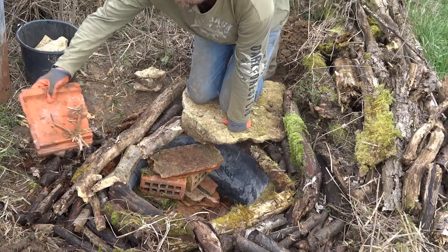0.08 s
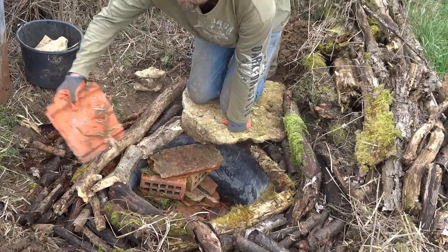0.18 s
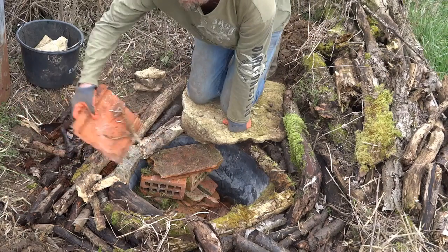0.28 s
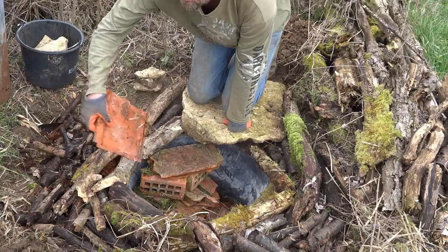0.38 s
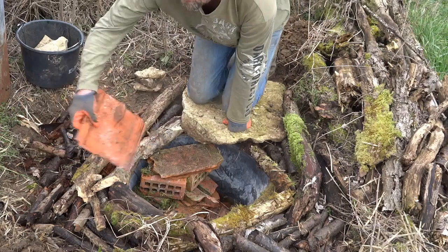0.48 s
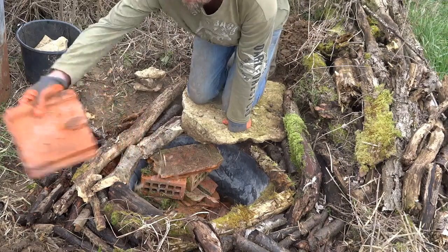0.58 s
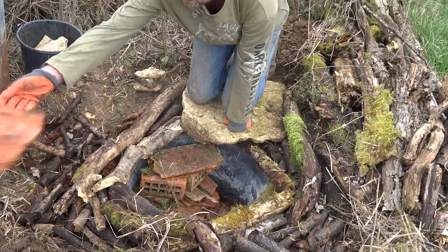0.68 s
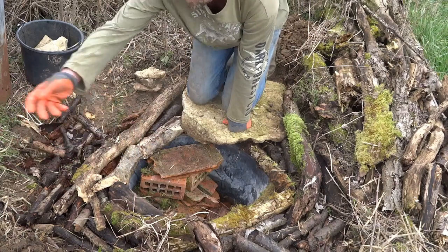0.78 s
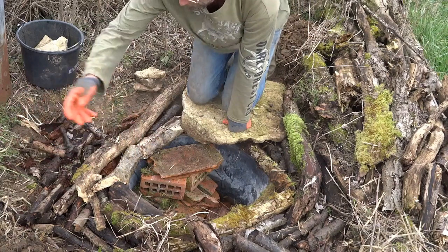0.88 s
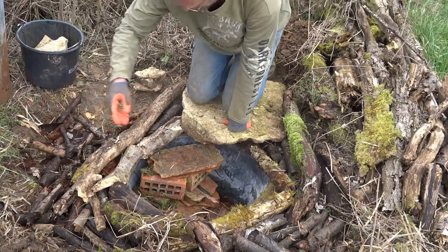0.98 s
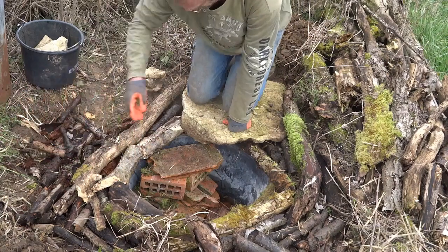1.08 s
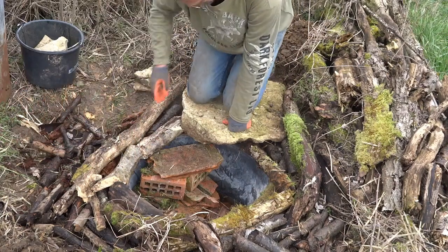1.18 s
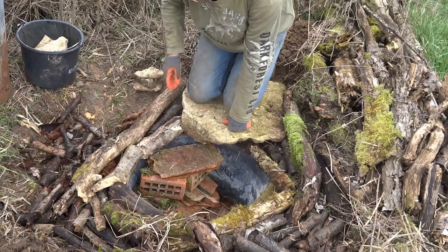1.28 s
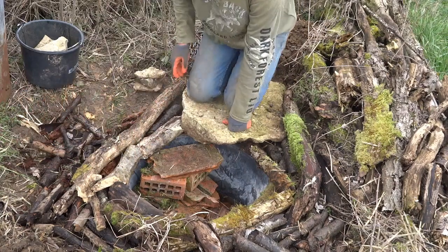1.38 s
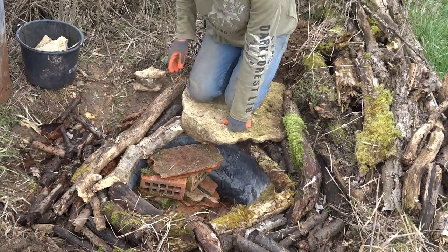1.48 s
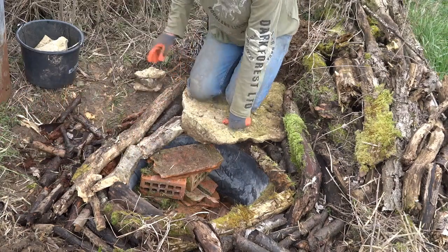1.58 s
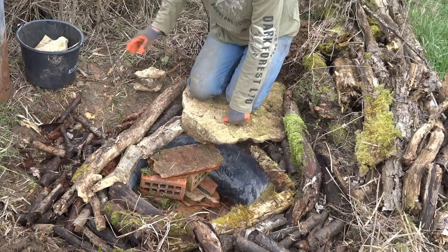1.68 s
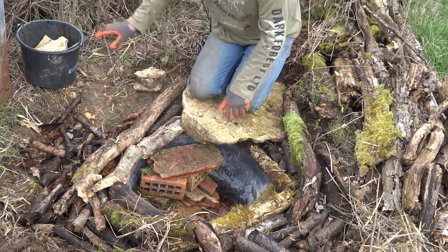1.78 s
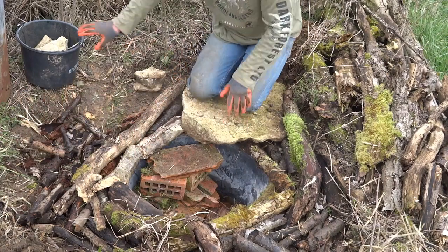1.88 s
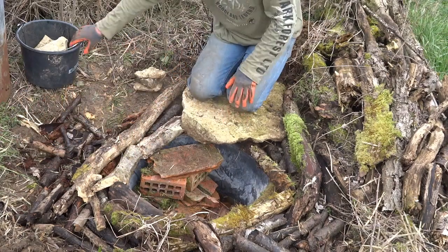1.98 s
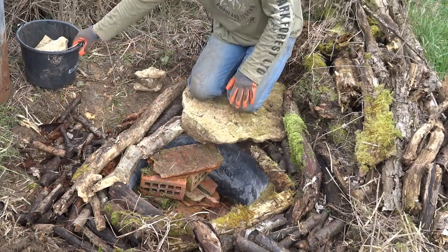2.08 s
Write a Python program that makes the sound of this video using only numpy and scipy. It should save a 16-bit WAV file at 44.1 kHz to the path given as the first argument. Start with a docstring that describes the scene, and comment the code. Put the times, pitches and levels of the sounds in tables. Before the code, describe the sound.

A clay roof tile clatters on bricks, then a thrown tile lands with a clink outdoors.

```python
"""A small bird chirps at the start, as gliding sine whistles over faint outdoor air made of coloured noise. A
clay roof tile clatters on a stack of bricks and broken tiles: noise clacks plus ringing modes; it stops dead. A
tile slips from a gloved hand with rubs of random slips and grit bursts; a low narrow-band hum comes and goes.
The tile lands to the left with a clink, its own clacks and modes, with a weak garden tail. A soft bump, a twig
snap, a last faint bird whistle and a faint low burst at the very end follow; all are noise bursts but the
whistle."""
import sys
import numpy as np
from scipy import signal
from scipy.fft import rfft, irfft
from scipy.io import wavfile

SR = 44100
rng = np.random.default_rng(int(sys.argv[2]) if len(sys.argv) > 2 else 0)


def generate_wav(sig):
    """Save sig (samples, or channels by samples) to the path in sys.argv[1] as 16-bit PCM at SR."""
    pcm = np.round(np.clip(np.atleast_2d(sig).T, -1, 1) * 32767).astype(np.int16)
    wavfile.write(sys.argv[1], SR, pcm)


N = 92610
TIME_S = np.arange(N) / SR
AGE_S = np.arange(SR // 3) / SR  # time since the start of one impact

# Contacts of tile and stack. Each row: start [s], level [dB], brightness [dB per octave], extra ring [dB].
KNOCKS = [(0.2353, -19.5, 5.5, 4), (0.2412, -17, -7.5, -6), (0.2438, -14.5, 1, 0.5),
          (0.2485, -20.5, 11.5, -8), (0.2540, -19, -6.5, -3.5), (0.2622, -20.5, -1.5, 3),
          (0.2712, -17.5, -3.5, -7.5), (0.277, -19.5, 0, 4), (0.2855, -19.5, -4.5, -20.5),
          (0.2905, -21.5, -0.5, -6), (0.2955, -31, 0, 0), (0.3172, -26, 3, -2), (0.3192, -22, -1, -1),
          (0.3222, -19.5, 0, -0.5), (0.326, -27, 0.5, 3), (0.335, -40.5, 3, 16.5), (0.3395, -19, -2, -16),
          (0.3505, -35, -13, -0.5), (0.3665, -24, 0, -6), (0.3855, -40, 5, -8), (0.3918, -28, 0, -2),
          (0.3938, -25, -4, 3), (0.4065, -44, -7, -27), (0.4125, -28, -5.5, 5)]
# Spectrum of the dense part of a knock. Each row: frequency [Hz], level [dB per Hz].
KNOCK_CLACK_COLOUR = [(40, -51), (110, -34), (200, -13.5), (330, -3.5), (900, 5.5), (1350, -6), (1700, -2),
                      (3000, -6), (4000, -25), (5200, -34.5), (6500, -28), (8000, -40.5), (11000, -32)]
# Damping of that part. Each row: frequency [Hz], 60 dB decay time [s].
KNOCK_CLACK_T60 = [(200, 0.019), (1000, 0.044), (3000, 0.024), (10000, 0.044)]
# Modes of the tile. One list each: frequency [Hz], level [dB], 60 dB decay time [s].
TILE_HZ = [337, 582, 798, 931, 1104, 1266, 1442, 1782, 2301, 2550, 2790, 3056, 5740, 6640]
TILE_DB = [-13, -11, -18, -5.5, -4, -5.5, -8.5, -13, -15.5, -24, -31, -22, -41, -32]
TILE_T60_S = [0.13, 0.16, 0.088, 0.16, 0.067, 0.076, 0.12, 0.12, 0.12, 0.068, 0.043, 0.049, 0.19, .05]
# Modes of the stack. One list each: frequency [Hz], level [dB], 60 dB decay time [s].
STACK_HZ = [400, 465, 562, 620, 684, 836, 953, 1029, 1202, 1323, 1375, 1675, 1842, 1960]
STACK_DB = [-11.5, -19.5, -13, -7, -13.5, -21.5, -6, -7, -7.5, -8.5, -21, -18.5, -16, -21.5]
STACK_T60_S = [0.042, 0.023, 0.21, 0.022, 0.052, 0.12, 0.16, 0.028, 0.11, .08, 0.036, .08, .06, .07]

# Contacts of the thrown tile. Each row: start [s], level [dB], brightness [dB per octave], extra ring [dB].
LANDINGS = [(1.0635, -37, 5, -6), (1.0697, -26, 1, -1), (1.0737, -29, -1, 5), (1.079, -33, 2, 1),
            (1.0842, -36, -5, 6), (1.166, -58, 1, 2), (1.189, -58, 1, 0)]
# Spectrum of its dense part. Each row: frequency [Hz], level [dB per Hz].
THROWN_CLACK_COLOUR = [(60, -36), (180, -17), (400, -17.5), (900, 6), (2000, 4), (3100, -16), (4200, -17),
                       (8000, -29.5), (11000, -18.5)]
# Damping of that part. Each row: frequency [Hz], 60 dB decay time [s].
THROWN_CLACK_T60 = [(200, 0.13), (1000, 0.027), (3000, 0.061), (10000, 0.11)]
# Modes of the thrown tile. One list each: frequency [Hz], level [dB], 60 dB decay time [s].
THROWN_HZ = [760, 764, 925, 1252, 1325, 1500, 1798, 2052, 2616, 2795, 3040, 3640]
THROWN_DB = [-29.5, -4, -7, 3, 2, -8.5, -22, -6.5, -16, -13, -8, -14]
THROWN_MODE_T60_S = [0.39, 0.071, 0.042, 0.051, 0.03, 0.026, 0.054, 0.036, 0.088, .055, 0.047, 0.05]

# Grit crushed and scraped on the tile; dry twigs snapping; soft low bumps and a faint low burst at the very
# end. Each row: start [s], level [dB], centre [Hz], width [octaves], 60 dB decay time [s], left minus right
# [dB].
GRIT = [(0.2425, -37, 7700, 0.98, 0.026, -20), (0.248, -38.5, 6360, 0.11, 0.053, -7),
        (0.2714, -40, 5840, 0.25, 0.01, -3), (0.2905, -37, 6000, 0.11, 0.0073, -10),
        (0.710, -38, 1250, 0.47, 0.099, 0.5), (0.730, -39.5, 1450, 0.66, 0.09, 3),
        (0.749, -39.5, 1500, 0.48, 0.1, 0.5), (1.0793, -29.5, 10070, 0.098, 0.0093, -7),
        (1.083, -34.5, 11000, 0.24, 0.0079, 7)]
TWIGS = [(0.806, -53, 3000, 0.29, 0.067, 0), (0.830, -49, 5940, 1, 0.017, 0),
         (1.608, -54.5, 8460, 1, 0.035, 0), (1.7215, -38, 3350, .18, .013, -1),
         (1.7217, -43.5, 2200, 0.41, 0.029, -1), (1.722, -38.5, 9200, 0.44, 0.02, -0.5)]
BUMPS_AND_LAST_BURST = [(1.4612, -47.5, 671, 0.94, 0.045, -1), (1.4722, -38.5, 263, 0.7, 0.04, -0.5),
                        (2.089, -52.5, 665, 1, 0.26, -2)]

# Rubs of tile, glove and sleeve. Each row: start [s], rise [s], hold [s], release [s], level [dB],
# brightness [dB per octave], left minus right [dB].
RUBS = [(0.0, 0.0017, 0.1, 0.014, -54, -2.5, -2), (0.077, 0.018, 0.13, .01, -58, -1, -1.5),
        (0.199, 0.017, 0.1983, 0.015, -44.5, -2, -4.5), (0.647, 0.047, 0.065, 0.021, -52.5, 0, 1),
        (0.697, 0.0098, 0.035, 0.037, -49.5, 0, 1), (0.768, 0.017, 0.033, 0.29, -58, -2, 1),
        (1.055, 0.0047, 0.014, 0.012, -48, -2, 3), (1.103, .04, 0.061, 0.079, -61, -2, 3.5),
        (1.447, 0.0084, 0.028, 0.064, -58, -3.5, -0.5), (1.761, 0.017, 0.013, 0.027, -61, 0.5, 3),
        (2.006, 0.022, 0.075, 0.21, -56.5, -0.5, 0)]
# Spectrum of a rub. Each row: frequency [Hz], level [dB per Hz].
RUB_COLOUR = [(60, -44), (250, -20), (500, -6), (1200, -4.5), (2200, -4.5), (3200, -6.5), (4500, -14),
              (10500, -14.5)]

# Bird notes, one list of points per note. Each row: time [s], pitch [Hz], level [dB].
BIRD_NOTES = [
    [(0.007, 2800, -50.5), (0.011, 3950, -48), (0.016, 4320, -41), (0.021, 4280, -54.5), (0.026, 4500, -63)],
    [(0.025, 2900, -53), (0.030, 3280, -44.5), (0.042, 3400, -53), (0.052, 3950, -58.5), (0.062, 4380, -54),
     (0.069, 4480, -47.5), (0.075, 4950, -52.5), (0.0775, 3500, -46.5), (0.08, 2900, -54.5)],
    [(0.080, 4890, -66), (0.083, 4470, -50), (0.086, 3850, -46.5), (0.093, 3200, -50.5), (0.099, 2850, -66)],
    [(1.835, 4200, -79), (1.885, 4135, -67), (1.935, 4030, -87)],
]
# Hum level over time. Each row: time [s], level [dB].
HUM_LEVEL = [(0.68, -81), (0.78, -64), (0.85, -57), (0.95, -62.5), (1.02, -58.5), (1.2, -63), (1.35, -71),
             (1.48, -84)]
# Spectrum of the outdoor air. Each row: frequency [Hz], level [dB per Hz].
AIR_COLOUR = [(30, -33), (120, -25), (230, -19), (350, -12), (520, -7), (700, -8), (1150, -5), (1380, -1.5),
              (1550, -6.5), (2800, -6), (4500, -17), (6500, -13.5), (8000, -17), (11000, -18),
              (12500, -66.5)]
# Left-right likeness of the air, then of near sources. Each row: frequency [Hz], likeness [1 = identical].
AIR_SAME = [(60, 0.75), (220, 1), (830, 0.37), (3100, 0.69), (11600, 0.72)]
NEAR_SAME = [(100, 1), (2000, 0.97), (5000, 0.59), (11000, 0.95)]

STOP_S, STOP_FADE_S = 0.4155, 0.00065
KNOCK_CLACK_DB, KNOCK_RING_DB = -1, -5
THROWN_CLACK_DB, THROWN_RING_DB = -0.33, -2
STACK_PAN_DB, STACK_LAG_S = -2, -0.000018
THROWN_PAN_DB, THROWN_LAG_S = 4, -0.000016
BLOW_ATTACK_S, SNAP_ATTACK_S = 0.0003, 0.00023
BASS_EDGE_HZ, RECORDER_EDGE_HZ = 205, 11180
RUB_GRAINS_PER_S, RUB_GRAIN_DB = 5300, 3.5
RUB_SMOOTH, RUB_SAME = 0.27, 0.87  # steady noise per unit of slips; share common to both ears
GARDEN_T60_S, LANDING_GARDEN_DB, BIRD_GARDEN_DB = 0.41, -28, -7
HUM_HZ, HUM_OCTAVES = 348.3, 0.18
AIR_DB, AIR_PAN_DB, AIR_DRIFT_DB = -62.5, -0.3, 0.4


def amp(db):
    """Decibels to gain."""
    return 10 ** (np.asarray(db) / 20)


def unit(x):
    """Scales to rms 1."""
    return x / np.sqrt(np.mean(x ** 2) + 1e-20)


def read(points, hz):
    """Reads a table on a log-frequency axis."""
    table_hz, value = np.transpose(points)
    return np.interp(np.log(hz + 1), np.log(table_hz + 1), value)


def octaves(hz, centre_hz=1000):
    """Distance from a centre in octaves."""
    return np.log2((hz + 1) / centre_hz)


def tilt_db(hz, db_per_octave):
    """Brightness about 1 kHz, held constant below -1 and above +2 octaves."""
    return db_per_octave * np.clip(octaves(hz), -1, 2)


def pan(db):
    """Left and right gains for a left-minus-right level difference."""
    return amp(np.array([[db / 2], [-db / 2]]))


def add(mix, start_s, sound):
    """Mixes a sound in at a time."""
    part = mix[:, max(round(start_s * SR), 0):][:, :sound.shape[-1]]
    part += sound[..., :part.shape[1]]


def noise(size, colour_db, same):
    """Stereo noise of rms 1 from random phases, with a colour and a left-right likeness table."""
    hz = np.fft.rfftfreq(size, 1 / SR)
    mid, side = np.exp(2j * np.pi * rng.random((2, len(hz))))
    likeness = np.clip(read(same, hz), -1, 1)
    mid = mid * np.sqrt(1 + likeness)
    side = np.array([[1], [-1]]) * side * np.sqrt(1 - likeness)
    return unit(irfft((mid + side) * amp(colour_db(hz)), size))


def lagged(x, lag_s):
    """Delays the left ear against the right; a negative lag makes the left lead."""
    turn = np.exp(-2j * np.pi * np.fft.rfftfreq(N, 1 / SR) * lag_s)
    return np.array([irfft(rfft(x[0]) * turn, N), x[1]])


def radiated(x):
    """Small objects give off little bass: a high-pass."""
    high_pass = signal.butter(3, BASS_EDGE_HZ, "high", fs=SR, output="sos")
    return signal.sosfilt(high_pass, x)


def garden(x):
    """Diffuse scatter from logs, plants and trees: a decaying noise tail."""
    tail = rng.standard_normal((2, len(AGE_S))) * amp(-60 * AGE_S / GARDEN_T60_S)
    return signal.fftconvolve(x, tail / np.linalg.norm(tail[0]), axes=1)[:, :N]


def clack(colour, t60s, tilt):
    """Dense noise burst; each frequency band decays at its own rate."""
    burst = noise(len(AGE_S), lambda hz: read(colour, hz) + tilt_db(hz, tilt), NEAR_SAME)
    hz, frame_s, bands = signal.stft(burst, SR, nperseg=128)
    damped = bands * amp(-60 * frame_s / read(t60s, hz)[:, None])
    return signal.istft(damped, SR, nperseg=128)[1][:, :len(AGE_S)]


def ring(modes, tilt):
    """Modes of fired clay: decaying sines of alternating sign."""
    out = np.zeros(len(AGE_S))
    for k, (hz, db, t60_s) in enumerate(zip(*modes)):
        decay = amp(db + tilt_db(hz, tilt) - 60 * AGE_S / t60_s)
        out += (-1) ** k * decay * np.sin(2 * np.pi * hz * AGE_S)
    return out


def blows(rows, modes, ring_db, clack_db, colour, t60s):
    """Each contact gives a dense, short clack and rings the modes."""
    out = np.zeros((2, N))
    attack = 1 - np.exp(-AGE_S / BLOW_ATTACK_S)
    for start_s, db, tilt, own_ring_db in rows:
        dense = amp(clack_db) * clack(colour, t60s, tilt)
        tonal = amp(ring_db + own_ring_db) * ring(modes, tilt)
        add(out, start_s, amp(db) * attack * (dense + tonal))
    return radiated(out)


def clatter():
    """The tile rattles on the stack, exciting the modes of both, until the sound stops dead."""
    modes = (TILE_HZ + STACK_HZ, TILE_DB + STACK_DB, TILE_T60_S + STACK_T60_S)
    x = blows(KNOCKS, modes, KNOCK_RING_DB, KNOCK_CLACK_DB, KNOCK_CLACK_COLOUR, KNOCK_CLACK_T60)
    stop = np.clip((STOP_S - TIME_S) / STOP_FADE_S, 0, 1)
    return lagged(x, STACK_LAG_S) * pan(STACK_PAN_DB) * stop


def landing():
    """The thrown tile lands in a run of contacts; the garden answers faintly."""
    modes = (THROWN_HZ, THROWN_DB, THROWN_MODE_T60_S)
    x = blows(LANDINGS, modes, THROWN_RING_DB, THROWN_CLACK_DB, THROWN_CLACK_COLOUR, THROWN_CLACK_T60)
    direct = lagged(x, THROWN_LAG_S) * pan(THROWN_PAN_DB)
    return direct + amp(LANDING_GARDEN_DB) * garden(x)


def snaps(rows):
    """Short dead impacts, each a decaying noise burst around one frequency."""
    out = np.zeros((2, N))
    attack = 1 - np.exp(-AGE_S / SNAP_ATTACK_S)
    for start_s, db, centre_hz, width, t60_s, pan_db in rows:
        def band_db(hz):
            """Level falls away on both sides of the centre."""
            offset = octaves(hz, centre_hz) / width
            return -20 * np.log10(1 + offset ** 2 / 2 + offset ** 4 / 10)

        burst = noise(len(AGE_S), band_db, NEAR_SAME)
        add(out, start_s, burst * amp(db - 60 * AGE_S / t60_s) * attack * pan(pan_db))
    return out


def grit():
    """Grit crushed and scraped on the tile: brief bursts with little bass."""
    return radiated(snaps(GRIT))


def twigs():
    """Dry twigs snapping: brief bursts with little bass."""
    return radiated(snaps(TWIGS))


def bumps_and_last_burst():
    """Soft low bumps and a faint low burst at the very end: lower bursts, their bass thinned too."""
    return radiated(snaps(BUMPS_AND_LAST_BURST))


def rubs():
    """Friction: a dense run of tiny slips that swells, holds and fades."""
    out, hz = np.zeros((2, N)), np.fft.rfftfreq(N, 1 / SR)
    for start_s, rise_s, hold_s, release_s, db, tilt, pan_db in RUBS:
        # row 0 is common to both ears, rows 1 and 2 belong to one ear each
        struck = rng.random((3, N)) < RUB_GRAINS_PER_S / SR
        size = amp(RUB_GRAIN_DB * np.minimum(rng.exponential(1, (3, N)), 4))
        slips = struck * size * rng.choice([-1, 1], (3, N))
        drive = unit(slips) + RUB_SMOOTH * rng.standard_normal((3, N))
        drive = np.sqrt(RUB_SAME) * drive[:1] + np.sqrt(1 - RUB_SAME) * drive[1:]
        colour = amp(read(RUB_COLOUR, hz) + tilt * octaves(hz))
        rub = unit(irfft(rfft(drive) * colour, N))
        corners_s = start_s + np.cumsum([0, rise_s, hold_s, release_s])
        out += rub * amp(db) * pan(pan_db) * np.interp(TIME_S, corners_s, [0, 1, 1, 0])
    return out


def bird():
    """Three quick gliding whistles and a later faint one, scattered by the garden."""
    x = np.zeros(N)
    for note in BIRD_NOTES:
        point_s, hz, db = np.transpose(note)
        sounding = (TIME_S > point_s[0]) * (TIME_S < point_s[-1])
        level = np.sqrt(2) * amp(np.interp(TIME_S, point_s, db))  # rms to peak
        phase = 2 * np.pi * np.cumsum(np.interp(TIME_S, point_s, hz)) / SR
        x += level * sounding * np.sin(phase)
    x = x * pan(0.5)
    return x + amp(BIRD_GARDEN_DB) * garden(x)


def hum():
    """Low wavering hum that comes and goes: narrow-band noise."""
    def band_db(hz):
        """One steep-sided band."""
        return -20 * np.log10(1 + (octaves(hz, HUM_HZ) / HUM_OCTAVES) ** 4)

    level_db = np.interp(TIME_S, *np.transpose(HUM_LEVEL), left=-np.inf, right=-np.inf)
    return noise(N, band_db, NEAR_SAME) * amp(level_db)


def air():
    """Faint outdoor hiss: coloured noise whose level drifts a little."""
    drift = unit(noise(N, lambda hz: -20 * np.log10(1 + (hz / 6) ** 2), NEAR_SAME)[0])
    hiss = noise(N, lambda hz: read(AIR_COLOUR, hz), AIR_SAME)
    return hiss * amp(AIR_DB + AIR_DRIFT_DB * drift) * pan(AIR_PAN_DB)


def scene():
    """All sources together."""
    tiles = clatter() + landing()
    small_impacts = grit() + twigs() + bumps_and_last_burst()
    return tiles + small_impacts + rubs() + bird() + hum() + air()


def record(dry):
    """The recorder's band limit: a linear-phase low-pass."""
    low_pass = signal.firwin(401, RECORDER_EDGE_HZ, window=("kaiser", 8), fs=SR)
    return signal.oaconvolve(dry, low_pass[None], "same")


dry = scene()
out = record(dry)
generate_wav(out)
```